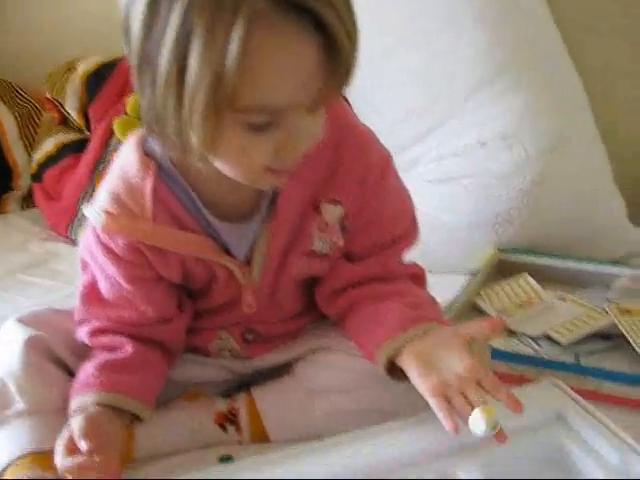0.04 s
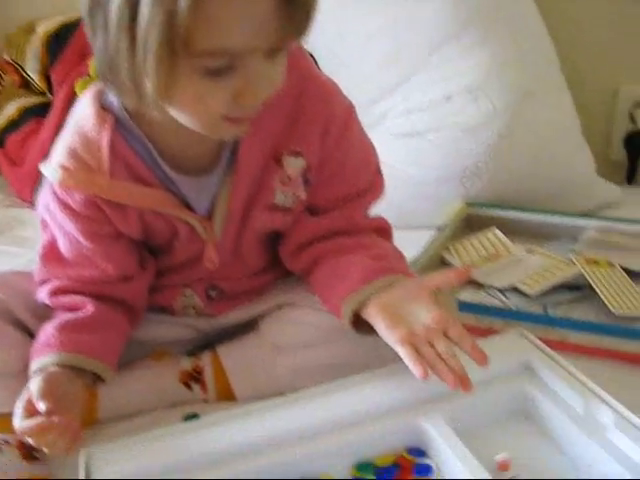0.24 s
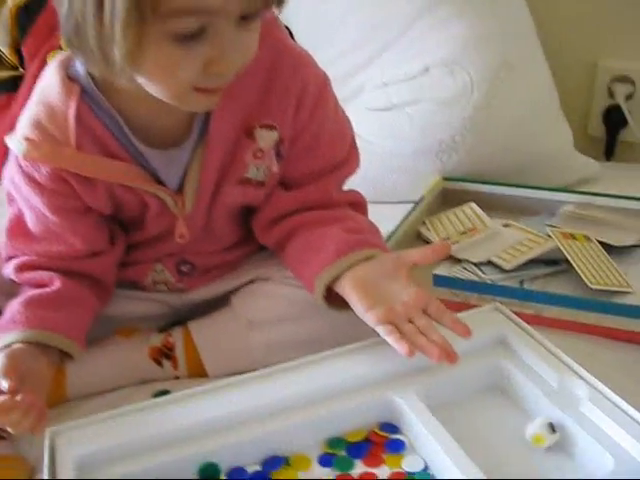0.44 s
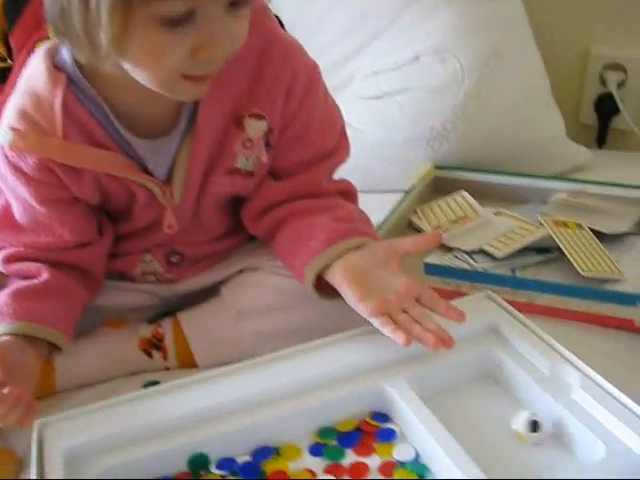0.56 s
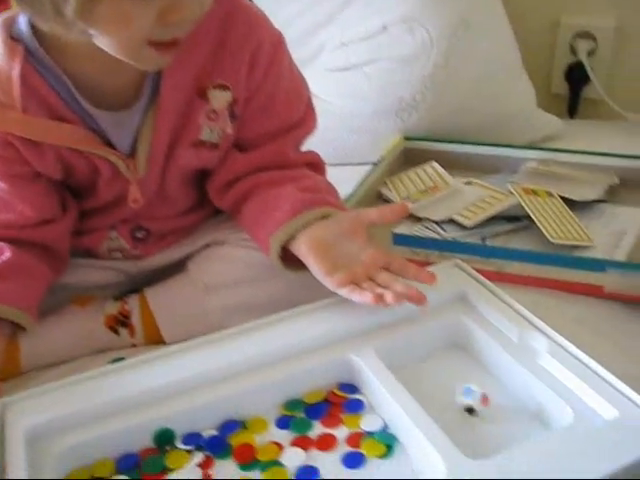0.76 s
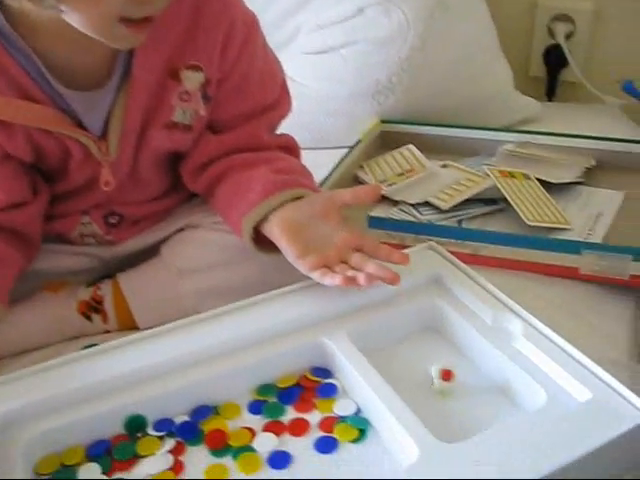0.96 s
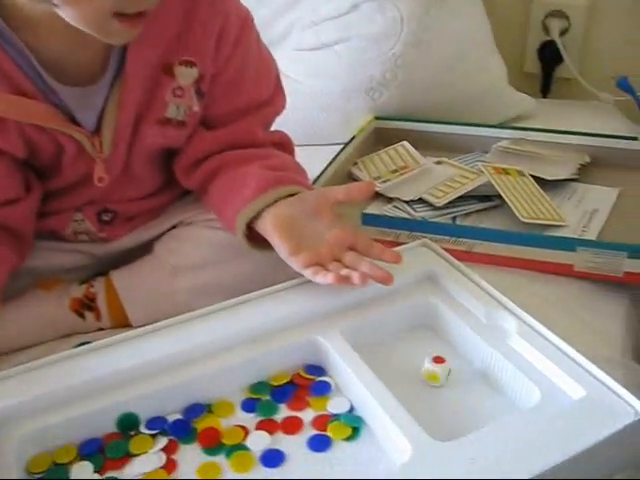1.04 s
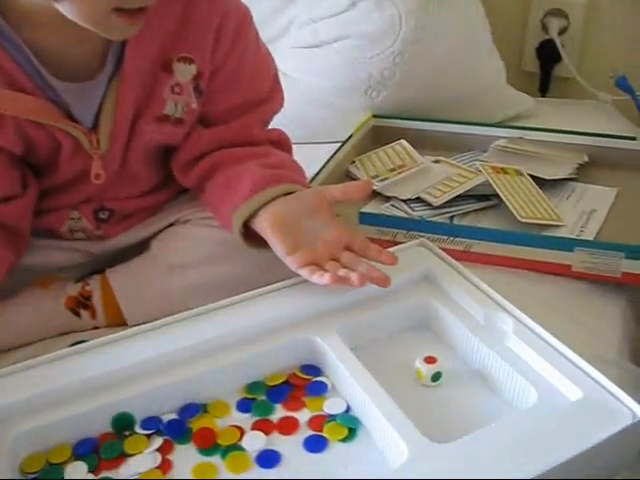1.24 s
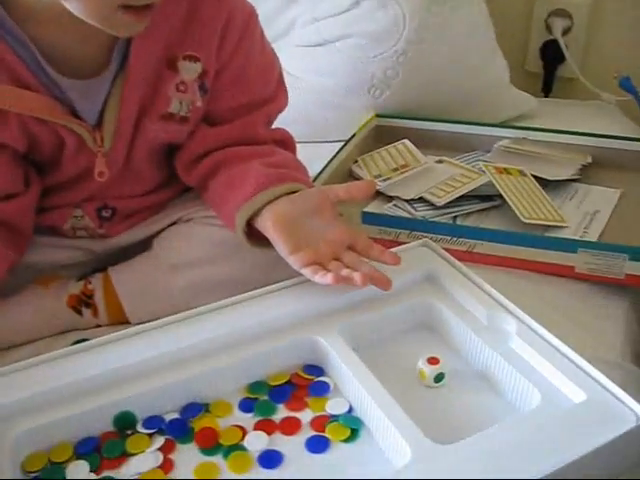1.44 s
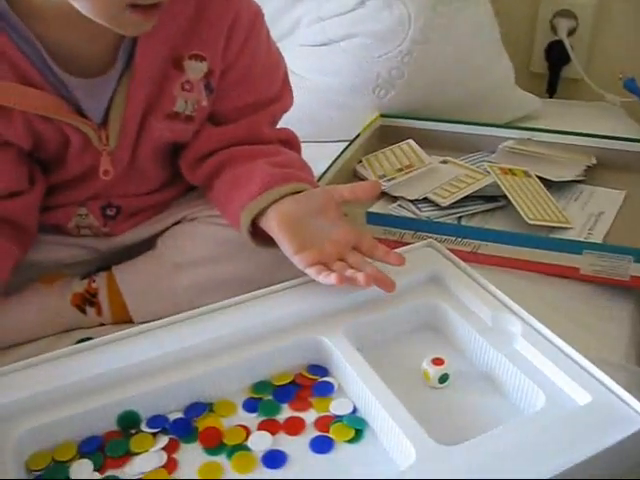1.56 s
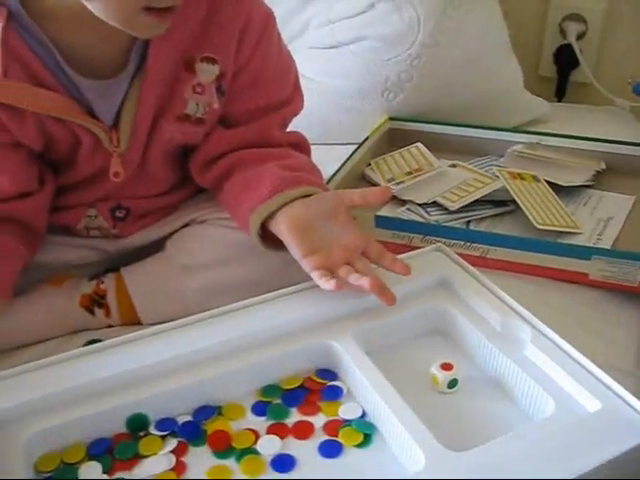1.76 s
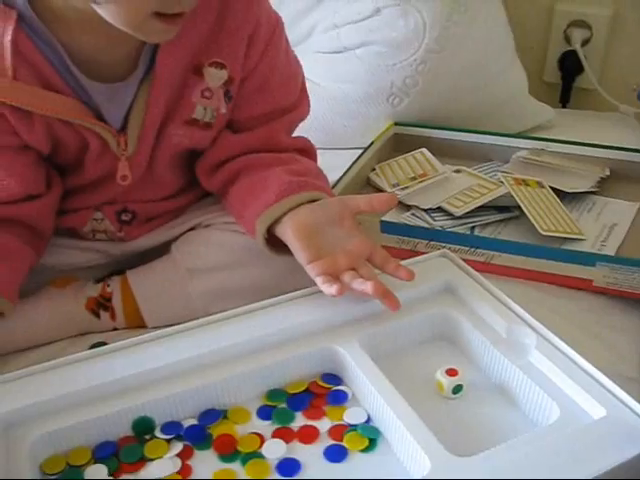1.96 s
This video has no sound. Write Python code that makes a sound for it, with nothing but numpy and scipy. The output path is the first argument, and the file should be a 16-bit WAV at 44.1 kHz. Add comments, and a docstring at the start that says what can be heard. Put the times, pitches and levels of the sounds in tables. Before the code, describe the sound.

A die drops into a plastic tray, clacks, bounces and rattles to rest.

```python
"""A small room with a low hum: a die drops into a moulded plastic tray, bounces, rolls over its
corners and rattles to rest. Each contact knocks the thin floor and rings the shell; the room answers.
A pocket camera's gain control ducks the loud hits; its coarse, low-rate converter adds a gritty fizz."""
import sys
import numpy as np
from scipy import signal
from scipy.fft import rfft, irfft
from scipy.io import wavfile
from scipy.ndimage import uniform_filter1d, minimum_filter1d

SR = 44100
rng = np.random.default_rng(int(sys.argv[2]) if len(sys.argv) > 2 else 0)


def master_out(mix):
    """Clip the mix to full scale and print it as 16-bit PCM to the path in sys.argv[1]."""
    frames = np.transpose(np.atleast_2d(mix))
    ceiling = np.clip(frames, -1, 1)
    pcm = np.round(ceiling * 32767).astype(np.int16)
    wavfile.write(sys.argv[1], SR, pcm)


N = 88200


def die():
    """Every contact from first hit to rest. Returns direct sound and spill into the room."""
    # Each row: start in seconds, strength in dB, bass in dB, treble in dB, floor knock in dB,
    # knock pitch in Hz, ring of tray and room in dB.
    contacts = [ (0.2131, -1.5, -2.5, 4, 8, 775, 0), (.2245, -13, -14, 3, -3, 870, 2),
                (0.3169, -1.5, 5, 1.5, 0.5, 725, -3), (0.3202, -12, 9, 1, 2.5, 678, -1),
                (.372, -22, 12, -8.5, -4, 450, 4), (.415, -22, -7, 12.5, -12, 905, -2),
                (.420, -16.5, -5, -1, -4, 1302, 1), (0.432, -24, 3, -2.5, -5, 775, 4),
                (.491, -25.5, -9, 1, -11, 1380, 6), (0.5414, -9, -11, 8.5, -0.5, 684, -5),
                (0.5459, -12, -12, 7, -4.5, 690, -5), (.760, -18.5, -3.5, -14, -5, 910, -3.5),
                (0.7725, -21, -6, -0.5, -5, 1606, -6), (.779, -25, 4, -1.5, -1.5, 864, -1.5),
                (0.787, -26, 11.5, -1.5, -4.5, 285, -2), (0.802, -29, 11.5, -1.5, -3, 293, -2.5),
                (.821, -24.5, 14, -6.5, -10, 920, -5.5), (1.080, -34, 7.5, 3, 1.5, 618, -6.5),
                (1.0884, -25.5, 2.5, -6, 6, 575, -6), (1.093, -16, 9.5, -2, 0, 705, -4),
                (1.098, -19.5, 9.5, -1, -3.5, 692, -4), (1.0999, -19, 6.5, -4, -1, 1250, -5.5),
                (1.1034, -16, 2, 0.5, -17, 890, -7.5), (1.149, -25.5, 5.5, 5.5, -4, 667, -9),
                (1.152, -17.5, -3, 0, -1.5, 1384, -8), (1.155, -14, 1, -3.5, 0.5, 1315, -8.5),
                (1.158, -21, 0, -4.5, 0, 880, -6), (1.1861, -22.5, 3.5, -3, 0.5, 582, -5.5),
                (1.1891, -24, 4.5, -1.5, -4, 1304, -14.5), (1.202, -28, 8.5, -11, 0.5, 748, -8.5),
                (1.209, -32, 12, 12, -1.5, 915, -2)]
    push_s, push_db = 0.0013, -9  # a brief sub-bass push under the first hit
    direct, spill = np.zeros((2, N))
    age = np.arange(SR // 10) / SR / push_s
    add(direct, contacts[0][0], -amp(push_db) * (1 - age) * np.exp(-age))
    low_cut = signal.butter(2, 125, "highpass", fs=SR, output="sos")  # each contact loses its bass below about 125 Hz
    for start_s, *blow, ring_db in contacts:
        hit = signal.sosfilt(low_cut, contact(*blow, ring_db))
        add(direct, start_s, hit)
        add(spill, start_s, amp(ring_db) * hit)
    return direct, spill


def contact(strength_db, bass_db, treble_db, knock_db, knock_hz, ring_db):
    """One blow: the floor panel knocks, the shell cracks and rings; two shelves set the tone."""
    knock_t60_s, bass_hz, treble_hz = 0.022, 360, 2630
    t = np.arange(SR // 3) / SR
    knock = amp(knock_db - 5) * decay(t, knock_t60_s) * np.sin(2 * np.pi * knock_hz * t)
    blow = shell_crack(t) + amp(ring_db) * tray_ring(t) - knock

    def shelves_db(hz):
        return bass_db / (1 + (hz / bass_hz) ** 2) + treble_db * hz ** 2 / (hz ** 2 + treble_hz ** 2)

    return amp(strength_db) * colour(blow, shelves_db)


def shell_crack(t):
    """The shell's many damped modes merge into a short noise burst."""
    # Each row: frequency in Hz, relative spectral density in dB.
    spectrum = [(40, -40.5), (100, -30), (190, 3), (420, -11.5), (700, -5.5), (1400, 2), (2200, -2.5),
                (3500, -5), (4600, -8), (5500, -9.5)]
    burst = sparse_noise(len(t), spacing=4) * decay(t, t60_s=0.044)
    return amp(7) * colour(burst, lambda hz: lookup(spectrum, hz))


def tray_ring(t):
    """The tray's ringing modes: damped sines, with new random phases at each blow."""
    # Each row: frequency in Hz, relative level in dB, T60 in seconds.
    modes = [(160.8, -17, 0.42), (190.5, -13, 0.27), (243.2, -8.5, 0.12), (308, -8.5, 0.061),
             (670.7, 0, 0.14), (752, -3, .18), (882, -1.5, 0.19), (1004, -9, 0.22), (1050, -6, 0.13),
             (1229, -5, .13), (1379, -14.5, .18), (1513, -6.5, 0.14), (1710, -9.5, 0.26), (2143, -6, 0.12),
             (2340, -8.5, 0.046), (3336, -12.5, 0.032), (4060, -1.5, 0.042)]
    phases = rng.uniform(0, 2 * np.pi, len(modes))
    return amp(-21) * sum(amp(db) * decay(t, t60_s) * np.sin(2 * np.pi * hz * t + phase)
                          for (hz, db, t60_s), phase in zip(modes, phases))


def room(spill):
    """Diffuse reflections, each band dying at its own rate."""
    # Each row: frequency in Hz, relative tail level in dB.
    spectrum = [(60, -19.5), (200, -6), (450, -2.5), (800, -1), (1400, 1.5), (2200, 3), (3500, -1),
                (5500, 0.5)]
    # Each row: frequency in Hz, T60 in seconds.
    decay_times = [(150, .5), (700, 0.52), (1500, 0.6), (3000, .43), (5500, .37)]
    delay_s = 0.006
    band_hz, t, bands = signal.stft(sparse_noise(SR, spacing=6), SR, nperseg=256)
    t60_s = lookup(decay_times, band_hz)[:, None]
    tail = signal.istft(bands * decay(t, t60_s), SR, nperseg=256)[1]
    tail = colour(tail / np.linalg.norm(tail), lambda hz: lookup(spectrum, hz))
    reflections = np.zeros(N)
    add(reflections, delay_s, amp(-6) * signal.fftconvolve(spill, tail))
    return reflections


def room_noise():
    """Soft noise, wavering slightly in level."""
    # Each row: frequency in Hz, relative spectral density in dB.
    spectrum = [(20, -5), (60, -4.5), (115, 0), (160, -5), (300, -4.5), (440, -3.5), (500, -1.5),
                (560, 5.5), (660, -3.5), (1000, -7), (2000, -10), (2900, -11), (3450, -9), (4000, -16.5),
                (5500, -23.5)]
    level_db, waver_db = -46.5, 0.77
    noise = unit_rms(colour(rng.standard_normal(N), lambda hz: lookup(spectrum, hz)))
    return noise * amp(level_db + waver_db * drift(rate_hz=6))


def electrical_hum():
    """Three low tones, each wandering in level and pitch."""
    # Each row: frequency in Hz, RMS level in dB.
    tones = [(101, -54), (198, -64.5), (402, -64)]
    waver_db, wander_hz = 3.2, 3
    hum = np.zeros(N)
    for hz, db in tones:
        peak = np.sqrt(2) * amp(db + waver_db * drift(rate_hz=4.8))
        pitch_hz = hz + wander_hz * drift(rate_hz=6.1)
        hum += peak * np.sin(2 * np.pi * np.cumsum(pitch_hz) / SR)
    return hum


def gain_control(x):
    """Limits peaks; a slow stage holds the dip, then recovers."""
    threshold_db, range_db, hold_s, recovery_db_per_s = -13, 9, 0.38, 24
    power_db = 10 * np.log10(abs(uniform_filter1d(x ** 2, size=128)) + 1e-12)
    over_db = np.maximum(power_db - threshold_db, 0)
    capped_db = np.minimum(over_db, range_db)
    span = int(hold_s * SR)
    held_db = -minimum_filter1d(-capped_db, span, origin=(span - 1) // 2, mode="nearest")  # trailing max
    recovery_db = recovery_db_per_s * np.arange(N) / SR
    dip_db = np.maximum.accumulate(held_db + recovery_db) - recovery_db
    return x * amp(-np.maximum(dip_db, over_db))


def converter(x):
    """Rounds to coarse steps and holds each; the input filter lets some treble fold down."""
    hold_samples, step, input_hz, output_hz = 4, 1 / 128, 5736, 15600
    samples = low_pass(x, input_hz)[::hold_samples]
    rounded = step * np.round(samples / step)
    return low_pass(np.repeat(rounded, hold_samples)[:N], output_hz)


def amp(db):
    """Decibels to gain."""
    return 10 ** (np.asarray(db) / 20)


def decay(t, t60_s):
    """Envelope falling 60 dB in t60_s."""
    return amp(-60 * t / t60_s)


def unit_rms(x):
    """Scales to RMS 1."""
    return x / np.sqrt(np.mean(x ** 2) + 1e-20)


def lookup(table, hz):
    """Interpolates on a log-frequency axis."""
    table_hz, values = np.transpose(table)
    return np.interp(np.log(hz + 1), np.log(table_hz + 1), values)


def colour(x, db_at):
    """Minimum-phase filter with a gain in dB of db_at(hz)."""
    size = 4096
    hz = abs(np.fft.fftfreq(size, 1 / SR))
    log_gain = np.log(amp(db_at(hz)))
    taps = np.fft.ifft(np.exp(np.conj(signal.hilbert(log_gain)))).real
    return signal.fftconvolve(x, taps[:size // 2])[:len(x)]


def drift(rate_hz):
    """Slow random motion of RMS 1."""
    hz = np.fft.rfftfreq(N, 1 / SR)
    return unit_rms(irfft(rfft(rng.standard_normal(N)) / (1 + (hz / rate_hz) ** 4), N))


def sparse_noise(size, spacing):
    """One tap of random sign and position in every `spacing` samples."""
    taps = np.zeros(size)
    starts = np.arange(0, size - spacing, spacing)
    taps[starts + rng.integers(0, spacing, len(starts))] = rng.choice([-1., 1.], len(starts))
    return taps


def low_pass(x, hz):
    """Steep FIR low-pass."""
    return signal.fftconvolve(x, signal.firwin(255, hz, window=("kaiser", 8), fs=SR), "same")


def add(mix, start_s, sound):
    """Mixes a sound in at start_s."""
    part = mix[round(start_s * SR):][:len(sound)]
    part += sound[:len(part)]


def scene():
    """Die, reflections, room noise and hum, in mono."""
    direct, spill = die()
    return (direct + room(spill) + room_noise() + electrical_hum())[None]


def record(dry):
    """The camera: gain control, hiss of its electronics, converter."""
    hiss = amp(-51) * rng.standard_normal(N)
    return converter(gain_control(dry[0]) + hiss)[None]


dry = scene()
out = record(dry)
master_out(out)
```